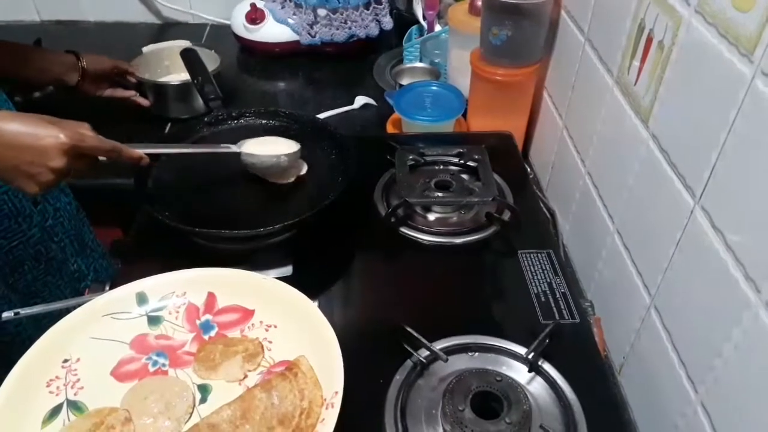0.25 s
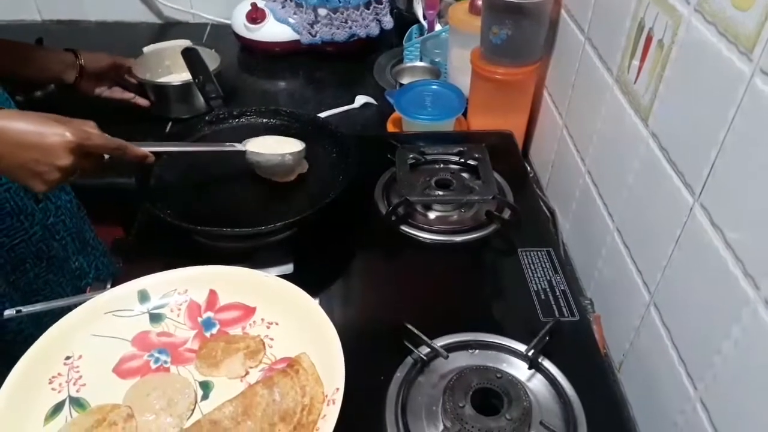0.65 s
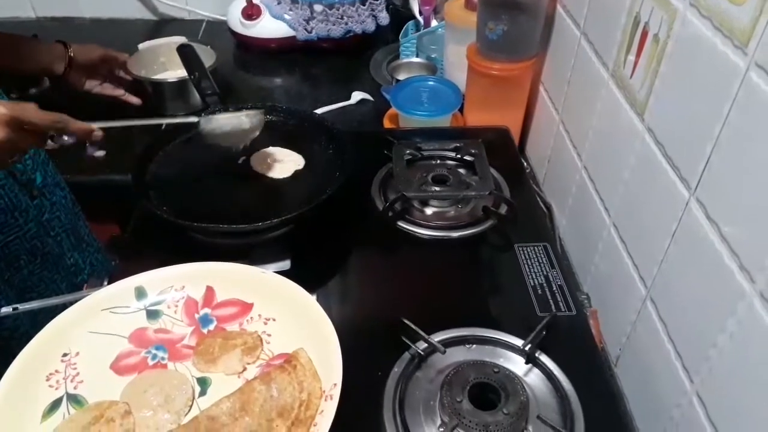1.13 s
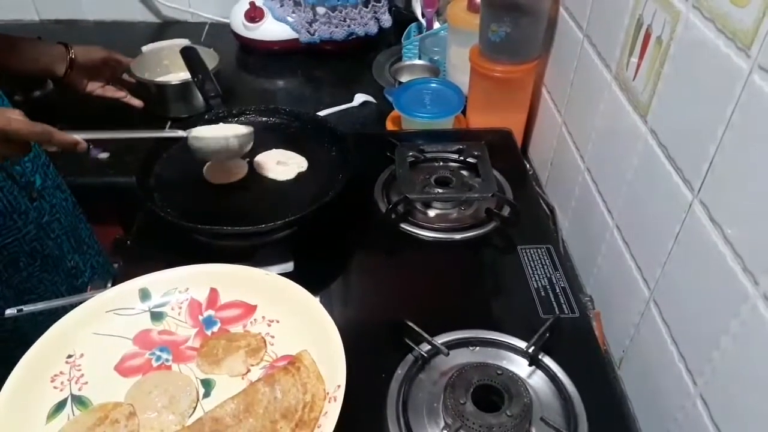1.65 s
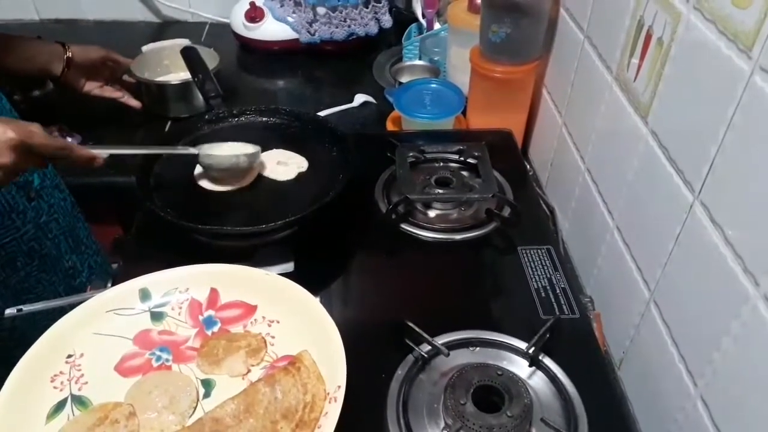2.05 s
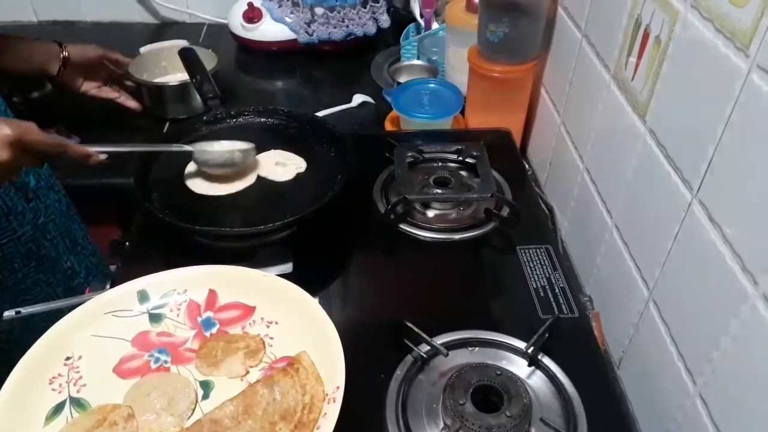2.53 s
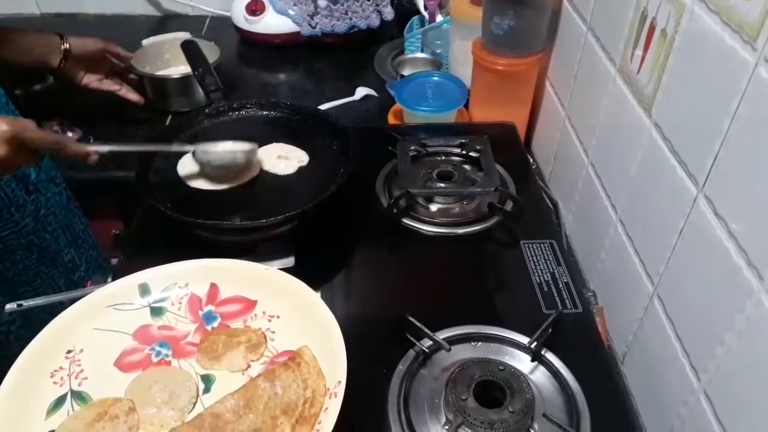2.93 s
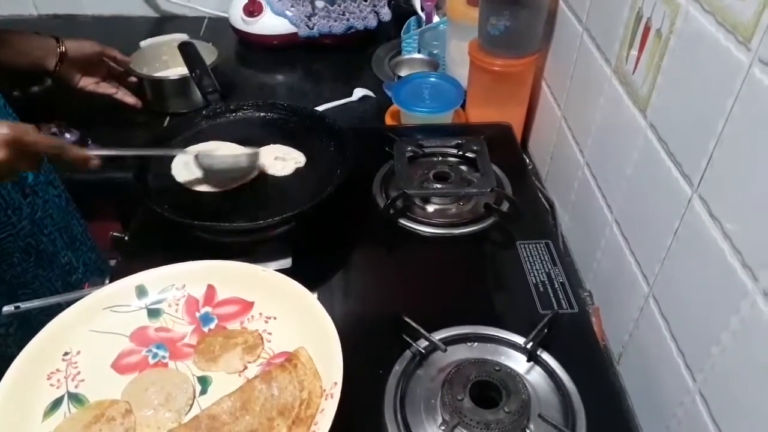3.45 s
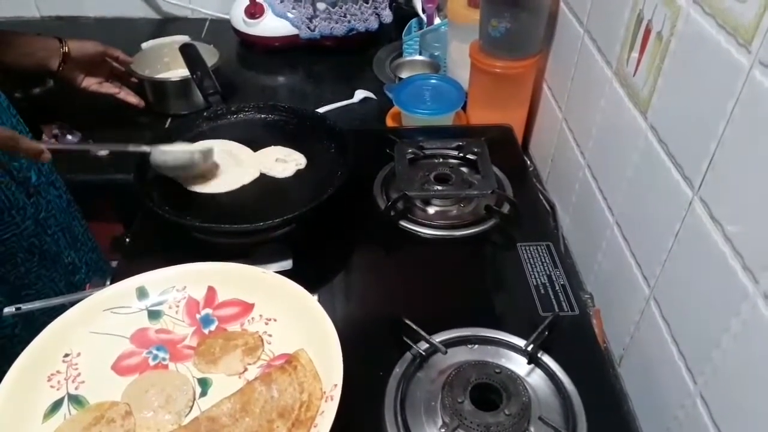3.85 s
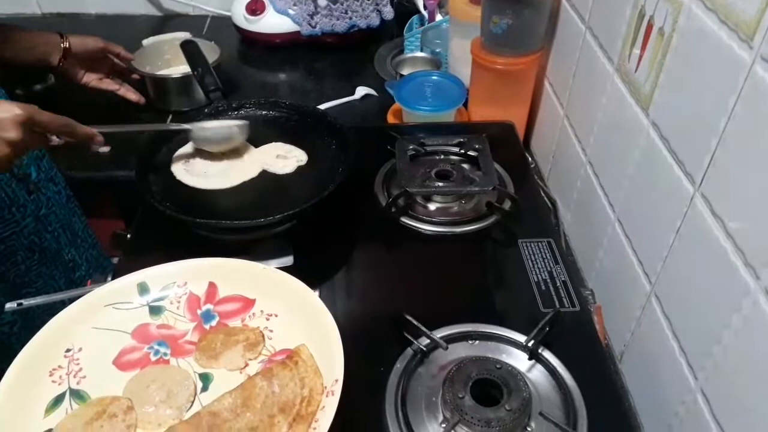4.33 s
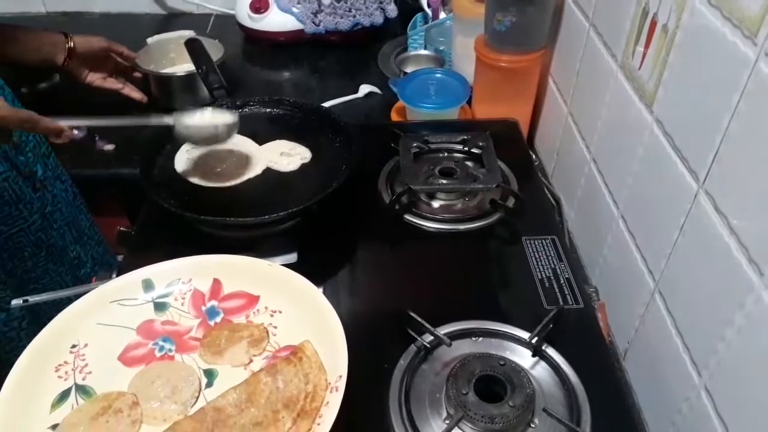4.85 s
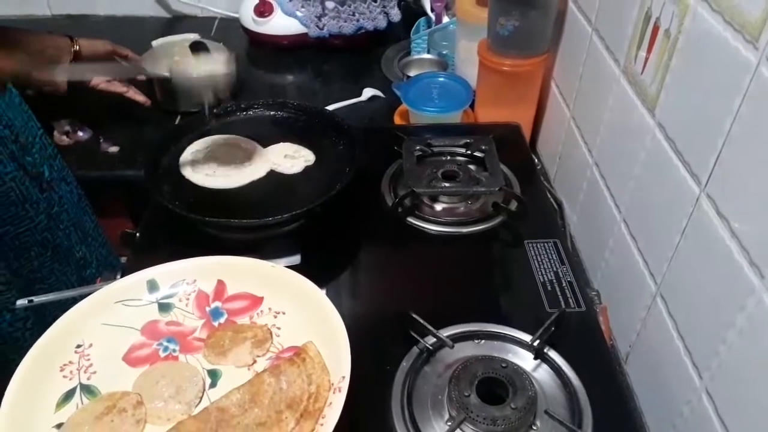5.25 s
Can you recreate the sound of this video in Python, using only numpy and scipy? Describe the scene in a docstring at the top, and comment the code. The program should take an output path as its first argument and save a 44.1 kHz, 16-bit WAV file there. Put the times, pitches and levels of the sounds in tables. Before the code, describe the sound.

Sizzling batter on a hot pan, a few soft plops, scraping metallic ladle strokes in rhythmic hissing swells, sparse spitting and a low gas flame.

```python
"""Batter on a hot griddle

Batter is ladled onto hot iron and spread in circles in a small tiled kitchen. Random bursts build its
sizzle: a dense hiss where fresh batter meets iron, a thin crackle where it has set, and single spits.
Narrow bands of noise make the steel ladle ring as it rubs, and trapped steam hisses downwards.
Sagging sine tones plop as drops land, and filtered noise makes the gas burner rush and rumble beneath.
"""
import sys
import numpy as np
from scipy import signal
from scipy.fft import rfft, irfft
from scipy.io import wavfile
from scipy.ndimage import uniform_filter1d

SR = 44100
rng = np.random.default_rng(int(sys.argv[2]) if len(sys.argv) > 2 else 0)


def wav_out(sig):
    """Save sig, one row per channel (or a flat mono array), as 16-bit PCM at SR to the path in sys.argv[1]."""
    wavfile.write(sys.argv[1], SR, np.round(np.clip(np.atleast_2d(sig).T, -1, 1) * 32767).astype(np.int16))


N = 241973
TIME = np.arange(N) / SR
FREQ = np.maximum(np.arange(N + 1) * SR / (2 * N), 1)

# Batter landing on the iron, levels before the sizzle trim: lands_s, spread_s (time constant),
# sets_s, level_db, fade_db_per_s, coarse_db and spray_db (both relative to level_db)
POURS = [(-0.2, 0.045, 0.314, -36, 29.5, -4.5, -0.7), (0.2, 0.031, 0.27, -42, 79, 0, -15),
         (0.41, .035, 0.498, -40.5, 54, -5, 2.5), (0.55, 0.06, 0.78, -45, 65, 3, -3),
         (1.2, 0.031, 1.42, -51.5, 27, 3, -2), (1.51, .075, 4.56, -41.5, 17, 2.5, -2),
         (1.99, .04, 4.12, -47, 40, 2, -0.5), (4.8, 0.02, 5, -47, 104, -13, 3.5)]
# Swells where fresh batter meets bare iron, levels before the sizzle trim: peak_s, rise_s,
# fall_s (half the decay time constant), level_db, coarse_db and spray_db (relative to level_db)
FLARES = [(0.165, 0.018, .02, -43, -5, 8), (0.525, 0.031, 0.023, -44.5, 3, 5),
          (0.815, .025, .018, -50, 7, -7), (1.31, 0.024, .025, -53, 5, 1), (1.83, 0.091, .035, -47, -4, 3),
          (2.085, 0.081, .11, -39, -0.5, 1.5), (2.335, .045, .07, -41, 3, -2),
          (2.515, .08, .12, -38.5, 2, -1.5), (2.785, .06, .11, -42.5, -3, -0.5),
          (3.0, .11, .075, -37.6, 2, 0.5), (3.285, 0.082, .075, -38, 1, -1),
          (3.545, 0.037, .05, -39.5, 0, 3.5), (3.76, .025, .05, -43, 3, 4.5),
          (3.865, .055, .05, -36, -1.5, -0.5), (4.04, 0.029, .04, -45, -10, 6),
          (4.135, 0.058, .07, -45, 3, 5.5), (4.29, 0.024, .025, -39, -7, -5),
          (4.525, .045, .1, -37, -18, 0.5), (5.03, 0.0099, .015, -47.5, -3, 8),
          (5.18, .025, .025, -51, 6.5, -1)]
COARSE_LAG_S = 0.037  # in a flare the big bubbles need longer to grow than the fine ones
# Thin crackle of batter that has set, before the sizzle trim, and its relative fine spray
SET_DB, SET_SPRAY_DB = -50.5, 1
# Colour of bursting bubbles without the broad resonances: frequency_hz, level_db
SIZZLE_COLOUR = [(80, -35), (500, -13), (800, -12.5), (1150, -22.5), (1400, -10.5), (1800, -8),
                 (2500, -3.5), (3400, -1.4), (4150, -5), (5200, -1.8), (6600, -4), (8500, -0.7),
                 (9400, -5.5), (12000, -5), (14200, -6.5), (15500, -11)]
# Broad resonances of griddle and stove top: frequency_hz, width_hz, lift_db
GRIDDLE_MODES = [(1700, 110, 3.3), (2620, 120, 1.6), (2830, 240, 5), (3705, 200, 2.7), (4680, 300, 4.1),
                 (5800, 550, 2.4), (6250, 220, 1.3), (7320, 420, 2.6), (8580, 620, 1.7), (9990, 400, 2.7),
                 (11260, 650, 4.6)]
# Highest hiss from a thick puddle, and while the batter is being spread
MIST_THICK_DB, MIST_SPREAD_DB = -3, -1.4
SPREADING_S, SPREADING_HALF_S = 2.94, 1.6
# Loudest spits: start_s, level_db (first millisecond, before trim and colour), tilt_db_per_octave
LOUD_SPITS = [(0.1642, -33, 1), (0.2925, -31, 0), (0.3795, -33, 0), (0.4742, -32, 1), (0.5302, -30, 2),
              (0.9181, -37, 1), (0.9434, -40, 1), (1.0921, -39, -1), (1.1625, -40, -1), (1.1754, -39, 1),
              (1.3997, -39, 0), (1.4528, -42, 2), (2.2279, -33, 0), (3.2149, -32, 0), (3.2817, -31, -1),
              (3.8815, -29, 1), (3.8915, -30, 0), (4.1375, -29, 1), (4.2753, -30, 1), (4.3839, -35, 0),
              (4.4662, -32, 1), (4.5128, -29, 0), (4.6301, -27, 1), (4.8408, -33, 2), (4.9166, -35, 1),
              (4.9913, -36, 2), (5.0215, -37, 2), (5.0245, -35, 1), (5.2015, -38, 1), (5.3008, -42, 3),
              (5.3339, -41, 3), (5.3563, -40, 2), (5.3985, -39, 2), (5.4085, -37, 1), (5.4755, -39, 2)]
# Small spits; levels are before trim and colour, tilt is per octave
SMALL_SPITS_PER_S, SMALL_SPIT_DB, SMALL_SPIT_SPREAD_DB, SMALL_SPIT_TILT_DB = 25, -42, -3, 5
# Ladle trapping steam under batter: centre_s, half_length_s (nominal), level_db (before colour),
# pitch_hz (centre of the hiss at mid-squeeze, before colour)
SQUEEZES = [(0.289, 0.062, -46.5, 3595), (2.501, .05, -46, 5230), (2.98, 0.063, -37.5, 4304),
            (3.269, 0.053, -45.5, 4220), (3.846, .05, -36.8, 4616), (4.545, 0.057, -40, 4910)]
SQUEEZE_FALL_OCT_PER_S, SQUEEZE_HALF_WIDTH_HZ = 9, 1440  # trapped bubbles grow, so their hiss falls
# Ladle modes: pitch_hz, half_width_hz (of each filter pass), light_db (resting in the batter),
# pressed_db (on the iron); levels are relative within each column
LADLE_MODES = [(990, 200, -4.5, -22), (1693, 75.2, -6, -20), (2225, 45, -5, -8), (3714, 56, -11, 3.5),
               (3910, 59.6, 0.5, -26), (4576, 50, 1.5, -1), (4740, 53, 2, -4), (5790, 47, 8, -12),
               (6060, 130, -2, 2)]
# Ladle strokes: centre_s, half_length_s, level_db, pressure (0-1)
STROKES = [(1.603, 0.088, -43.5, 0), (1.85, 0.18, -43, 0.2), (2.081, 0.11, -40.5, 0.44),
           (2.296, 0.13, -43, 0.7), (2.5, 0.11, -41.5, 0.4), (2.886, 0.12, -42.5, 0.91),
           (3.291, 0.16, -46, 0.92), (3.564, 0.078, -41, 0.64), (3.835, 0.0865, -42.5, 0.84),
           (4.067, 0.15, -44.5, 0.9), (4.303, 0.086, -49, 0.8), (4.58, 0.13, -53, 0.81)]
# Bowl's strongest mode, wandering with the batter that clings to it: time_s, pitch_hz
BOWL_PITCH = [(1.5, 2750), (1.7, 2770), (1.85, 2915), (2.08, 2920), (2.19, 2730), (2.3, 2860), (2.75, 2885),
              (3.07, 2810), (3.45, 2860), (4.3, 2820)]
BOWL_HALF_WIDTH_HZ, BOWL_LIGHT_DB, BOWL_PRESSED_DB = 60, 1, 4  # same meaning as in LADLE_MODES
# Drops of batter: start_s, pitch_hz (at the start), level_db (nominal peak), t60_s
PLOPS = [(0.325, 395, -47, .08), (0.33, 570, -53, .07), (1.115, 640, -51, .13), (1.186, 580, -45.5, .14),
         (1.197, 490, -52, .1), (1.213, 330, -51, .14), (1.252, 390, -51.5, .16), (1.265, 262, -51, .16),
         (1.365, 390, -54, .06), (5.385, 290, -51, .08)]
# Gas burner and low background over time: time_s, rush_db, rumble_db
BURNER_LEVELS = [(0.0, -54, -68), (0.25, -63.5, -65), (0.36, -54, -66.5), (0.78, -57.5, -70),
                 (0.949, -57.5, -72), (1.48, -58.5, -66.5), (1.68, -54, -67), (2.1, -54.5, -82),
                 (2.5, -55, -93), (2.9, -53, -80), (3.6, -56.5, -72), (4.2, -55, -75.5), (4.7, -55, -63.5),
                 (5.2, -59, -72), (5.48, -61.5, -66)]
# Outline of the rush: frequency_hz, level_db
BURNER_COLOUR = [(20, -5), (40, -10), (70, -47), (115, -14), (170, -1), (330, -3.5), (600, -3), (900, -7.5),
                 (1300, -7.5), (3000, -13), (12000, -60)]
# Hollow resonances of the rush: frequency_hz, width_hz, lift_db
BURNER_MODES = [(281, 22, 7.5), (393, 28, 8.5), (1085, 45, 6)]
# Outline of the rumble: frequency_hz, level_db
RUMBLE_COLOUR = [(20, -21), (45, -15), (65, -2), (88, 0), (120, -4.5), (170, -6.5), (260, -26),
                 (1000, -72.5)]
TOP_HZ = 15750  # upper limit of the sound


def sizzle(rate_per_s=4000, spread_db=1.5, hiss_db=-4, trim_db=1.86, coarse_trim_db=1,
           dry_s=5.0, dry_thinning=.65, flutter_db=0.81, spray_flutter_db=0.88):
    """The more wet batter touches the iron, the denser and louder the bursts, until they merge to a hiss."""
    level_db, coarse_db, spray_db = boiling()
    level_db = level_db + flutter_db * walk(45)
    boil = undb(level_db - np.median(level_db))
    # once the batter is spread thin it dries, and the bursts stand further apart
    moisture = 1 + (dry_thinning - 1) / (1 + np.exp(-(TIME - dry_s) / 0.17))
    fizz = crackle(rate_per_s * moisture * np.sqrt(boil), spread_db)
    fizz = unit(fizz + undb(hiss_db) * rng.standard_normal(N))
    # big wet bubbles sound low and burst on their own; the finest ones sound high
    lows = 1 / (1 + (FREQ / 2600) ** 6)
    highs = 1 - 1 / (1 + (FREQ / 9200) ** 8)
    coarse = crackle(9000 * np.sqrt(boil), 2.2, count=96)
    coarse = coarse * undb(coarse_db + coarse_trim_db + flutter_db * walk(40))
    spray_gain = undb(spray_db + spray_flutter_db * walk(40))
    spray_change = shape(fizz, highs) * (spray_gain - 1)
    mix = shape(fizz, np.sqrt(1 - lows)) + shape(coarse, np.sqrt(lows)) + spray_change
    coloured = shape(mix, causal(colour(SIZZLE_COLOUR, GRIDDLE_MODES)))
    return unit(coloured) * undb(level_db + trim_db)


def boiling():
    """Pours, flares and set batter add bubble power: overall dB, relative coarse dB and fine spray dB."""
    whole = undb(SET_DB) ** 2 * np.ones(N)
    coarse = whole
    spray = whole * undb(SET_SPRAY_DB) ** 2
    for lands, spread_s, sets, db, fade, coarse_db, spray_db in POURS:
        gain = undb(db) * held(lands, sets, spread_s, fade)
        whole = whole + gain ** 2
        coarse = coarse + (gain * undb(coarse_db)) ** 2
        spray = spray + (gain * undb(spray_db)) ** 2
    for s, rise_s, fall_s, db, coarse_db, spray_db in FLARES:
        gain = undb(db) * flare(s, rise_s, fall_s)
        late = undb(db) * flare(s + COARSE_LAG_S, rise_s, fall_s)
        whole = whole + gain ** 2
        coarse = coarse + (late * undb(coarse_db)) ** 2
        spray = spray + (gain * undb(spray_db)) ** 2
    return 10 * np.log10([whole, coarse / whole, spray / whole])


def held(start, end, attack_s, fade_db_per_s):
    """An envelope that rises as batter spreads, holds, and fades as it sets."""
    rise = 1 - np.exp(-np.maximum(TIME - start, 0) / attack_s)
    return rise * undb(-fade_db_per_s * np.maximum(TIME - end, 0))


def flare(s, rise_s, fall_s):
    """A bell-shaped swell with an exponential fall, 1 at its top."""
    return np.exp(-(np.minimum(TIME - s, 0) / rise_s) ** 2 - np.maximum(TIME - s, 0) / (2 * fall_s))


def crackle(rate, spread_db, count=160):
    """Bursts at random moments, mostly tiny, in many spots that each have their own colour."""
    out = np.zeros(N)
    moments = np.flatnonzero(rng.random(N) < rate / SR)
    sizes = undb(spread_db * np.minimum(rng.exponential(size=N), 4.2))
    for spot in range(count):
        ring = burst(.0003, -12, .0024)
        starts = moments[spot::count]
        places = starts[:, None] + np.arange(len(ring))
        bursts = np.outer(sizes[starts], ring)
        out += np.bincount(places.ravel(), bursts.ravel(), N)[:N]
    return unit(out / np.sqrt(rate))


def burst(decay_s, tail_db, tail_s, size=400):
    """One bubble bursting: a sharp crack and its scatter off the pan and stove."""
    t = TIME[:size]
    envelope = np.exp(-t / decay_s) + undb(tail_db) * np.exp(-t / tail_s)
    x = rng.standard_normal(size) * envelope
    return x / np.sqrt(np.sum(x ** 2))


def spits(trim_db=.8):
    """Larger bubbles snap on their own, dull or bright: a few loud ones, and small ones at random."""
    out = np.zeros(2 * N)
    moments = np.flatnonzero(rng.random(N) < SMALL_SPITS_PER_S / SR)
    sizes_db = SMALL_SPIT_DB + SMALL_SPIT_SPREAD_DB * rng.standard_normal(N)
    small = [(TIME[i], sizes_db[i], SMALL_SPIT_TILT_DB) for i in moments]
    for s, db, tilt_db in LOUD_SPITS + small:
        snap = burst(.0004, -15, .0025) * np.sqrt(SR / 1000)
        # tilt pivots at 7 kHz and stays level below 500 Hz
        octaves = np.log2(np.maximum(np.fft.rfftfreq(len(snap), 1 / SR), 500) / 7000)
        snap = irfft(rfft(snap) * undb(tilt_db * octaves))
        start = int(s * SR)
        out[start:start + len(snap)] += undb(db + trim_db) * snap
    ring = colour(SIZZLE_COLOUR, GRIDDLE_MODES)
    return shape(out[:N], causal(unit(ring)))


def mist(x):
    """A thick puddle muffles the very highest hiss; spreading the batter lets more of it out."""
    db = MIST_THICK_DB + (MIST_SPREAD_DB - MIST_THICK_DB) * bump(SPREADING_S, SPREADING_HALF_S)
    top = shape(x, 1 - 1 / (1 + (FREQ / 12200) ** 32))
    return x + top * (undb(db) - 1)


def squeezes():
    """Steam trapped by the ladle escapes in a short, dense spurt of bubbles whose hiss glides down."""
    out = 0
    for s, half, db, hz in SQUEEZES:
        centre = hz * 2 ** (-SQUEEZE_FALL_OCT_PER_S * np.clip(TIME - s, -2 * half, 2 * half))
        spurt = ringing(centre, SQUEEZE_HALF_WIDTH_HZ, 0)
        out = out + undb(db) * spurt * np.exp(-((TIME - s) / (1.75 * half)) ** 2)
    return shape(out, causal(colour(SIZZLE_COLOUR, GRIDDLE_MODES)))


def ladle(steadiness=0.27, grit_db=1):
    """Rubbing rings the steel bowl; pressing favours other modes, and shifting batter detunes them."""
    light, firm = 0, 0
    for s, half, db, pressure in STROKES:
        stroke = undb(db) * bump(s, half)
        light = light + stroke * (1 - np.clip(pressure, 0, 1))
        firm = firm + stroke * np.clip(pressure, 0, 1)
    detune = 1 + .005 * walk(14)
    bowl_hz = np.interp(TIME, *np.transpose(BOWL_PITCH))
    modes = LADLE_MODES + [(bowl_hz, BOWL_HALF_WIDTH_HZ, BOWL_LIGHT_DB, BOWL_PRESSED_DB)]
    out = 0
    for column, force in enumerate((light, firm)):
        ring = 0
        for hz, half_width, *levels_db in modes:
            ring = ring + undb(levels_db[column]) * ringing(hz * detune, half_width, steadiness)
        out = out + force * unit(ring)
    return out * undb(grit_db * walk(200))


def ringing(hz, half_width_hz, steadiness):
    """A narrow noise band as one mode: its phase drifts, and steadiness evens out its level."""
    z = rng.standard_normal(N) + 1j * rng.standard_normal(N)
    pole = np.exp(-2 * np.pi * half_width_hz / SR)
    for _ in range(2):
        z = signal.lfilter([1], [1, -pole], z)
    z = z / (np.abs(z) + 1e-9) ** np.clip(steadiness, 0, 1)
    carrier = np.exp(2j * np.pi * np.cumsum(hz * np.ones(N)) / SR)
    return unit(np.real(z * carrier))


def plops(sag_per_s=1.7, attack_s=0.001094):
    """Thick drops land softly as decaying sine tones; their pitch sags as they spread."""
    out = 0
    for s, hz, db, t60 in PLOPS:
        t = np.maximum(TIME - s, 0)
        phase = 2 * np.pi * np.cumsum(hz * np.exp(-sag_per_s * t) * (t > 0)) / SR
        envelope = (1 - np.exp(-t / attack_s)) * np.exp(-np.log(1000) * t / t60)
        out = out + undb(db) * np.sin(phase) * envelope
    return out


def kitchen(x, wet_db=-15, t60_s=.2):
    """Tiled walls add a short tail of decaying noise."""
    t = TIME[:SR // 2]
    tail = rng.standard_normal(len(t)) * np.exp(-np.log(1000) * t / t60_s) * (t > .003)
    echo = signal.fftconvolve(x, tail / np.sqrt(np.sum(tail ** 2)))[:N]
    return (x + undb(wet_db) * echo) / np.sqrt(1 + undb(wet_db) ** 2)


def burner(side_db=-14, waver_db=1.62):
    """The gas flame and the kitchen around it: a soft hollow rush of noise over a low rumble."""
    s, *columns = np.transpose(BURNER_LEVELS)
    rush_db, rumble_db = (np.interp(TIME, s, c) for c in columns)
    rush = unit(shape(rng.standard_normal((2, N)), colour(BURNER_COLOUR, BURNER_MODES)))
    rumble = unit(shape(rng.standard_normal((2, N)), colour(RUMBLE_COLOUR)))
    x = rush * undb(rush_db + waver_db * walk(30)) + rumble * undb(rumble_db)
    # only the lows have a little stereo width
    side = undb(side_db) * shape(x[1], 1 / (1 + (FREQ / 1800) ** 6))
    return x[0] + side * np.array([[1], [-1]])


def undb(db):
    """Decibels to gain."""
    return 10 ** (np.asarray(db) / 20)


def unit(x):
    """Scale to rms 1."""
    return x / np.sqrt(np.mean(x ** 2))


def bump(centre, half):
    """A smooth, flat-topped swell in time, 1 at its centre."""
    return np.exp(-((TIME - centre) / half) ** 4)


def walk(rate):
    """Slow random drift with a spread of about 1, from smoothed random steps."""
    k = max(int(SR / rate), 1)
    steps = np.repeat(rng.standard_normal(N // k + 1), k)
    return unit(uniform_filter1d(steps, k)[:N])


def peak(hz, width):
    """Bell of one resonance over frequency, 1 at its centre."""
    return 1 / (1 + (2 * (FREQ - hz) / width) ** 2)


def colour(points, resonances=()):
    """Gain by frequency from an outline and resonant lifts."""
    hz, db = np.transpose(points)
    outline_db = np.interp(np.log(FREQ), np.log(hz), db)
    return undb(outline_db + sum(lift * peak(f, w) for f, w, lift in resonances))


def shape(x, gain):
    """Filter by a gain over frequency."""
    return irfft(rfft(x, 2 * N) * gain)[..., :N]


def causal(gain):
    """The same response with all its ringing after the blow (minimum phase)."""
    cepstrum = irfft(np.log(gain))
    cepstrum[1:N] *= 2
    cepstrum[N + 1:] = 0
    return np.exp(rfft(cepstrum))


def scene():
    """Griddle, ladle and drops in the kitchen, over the burner."""
    griddle = mist(sizzle() + spits())
    return kitchen(griddle + squeezes() + ladle() + plops()) + burner()


def record(dry):
    """A steep low-pass filter cuts the top."""
    return signal.sosfilt(signal.ellip(10, .2, 80, TOP_HZ, fs=SR, output="sos"), dry)


dry = scene()
out = record(dry)
wav_out(out)
```